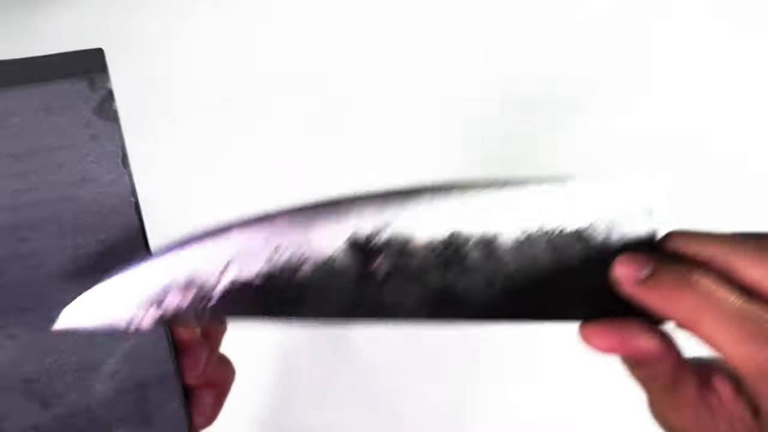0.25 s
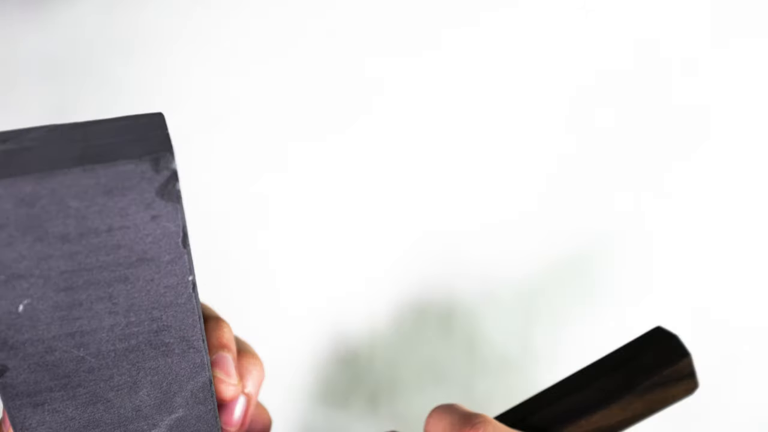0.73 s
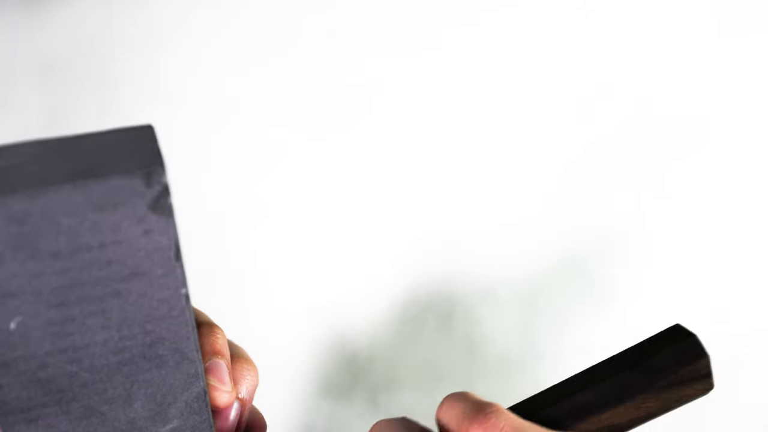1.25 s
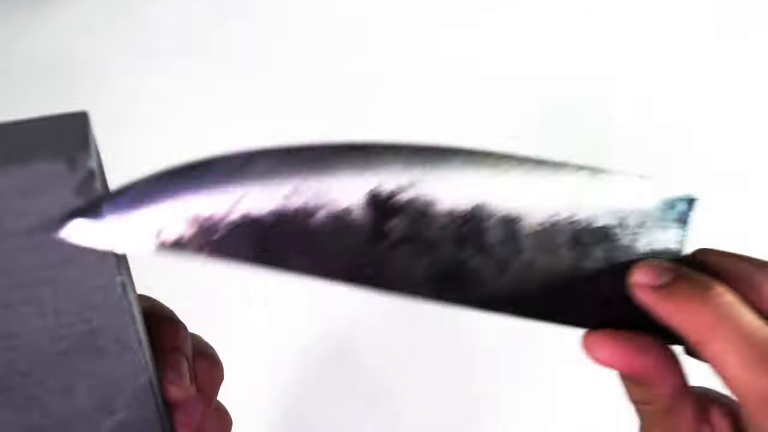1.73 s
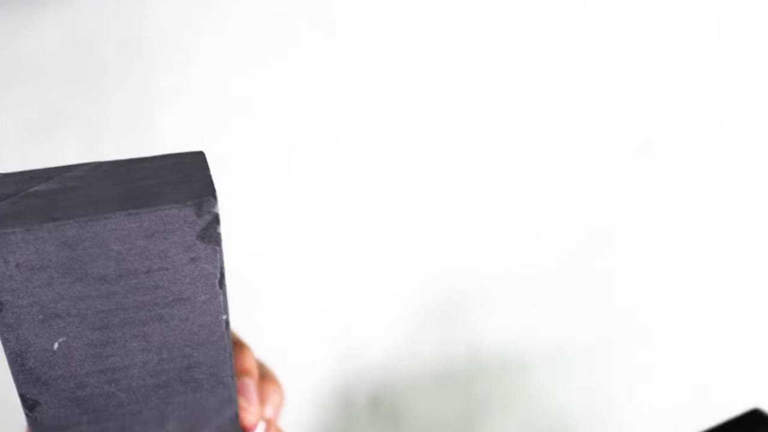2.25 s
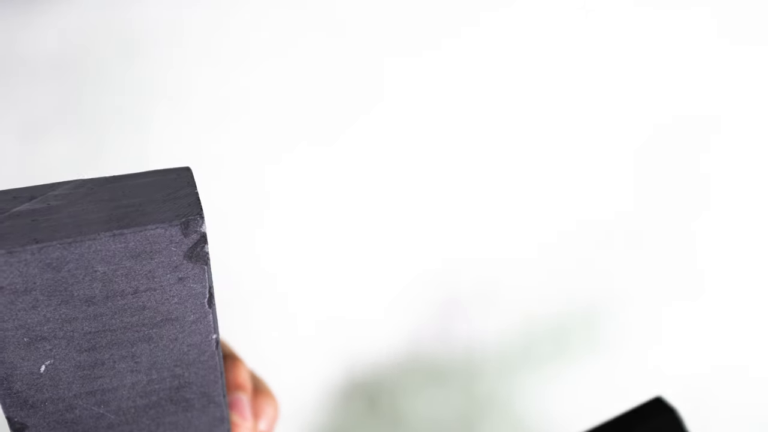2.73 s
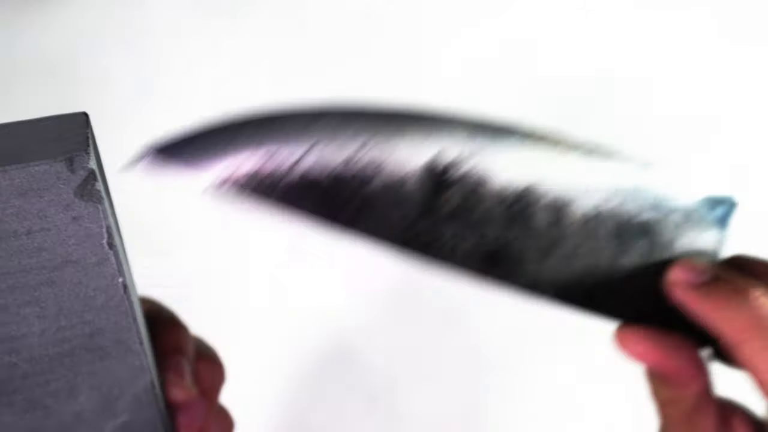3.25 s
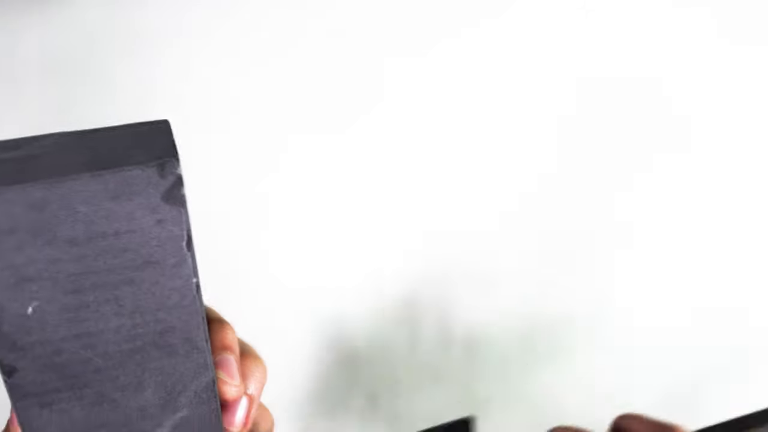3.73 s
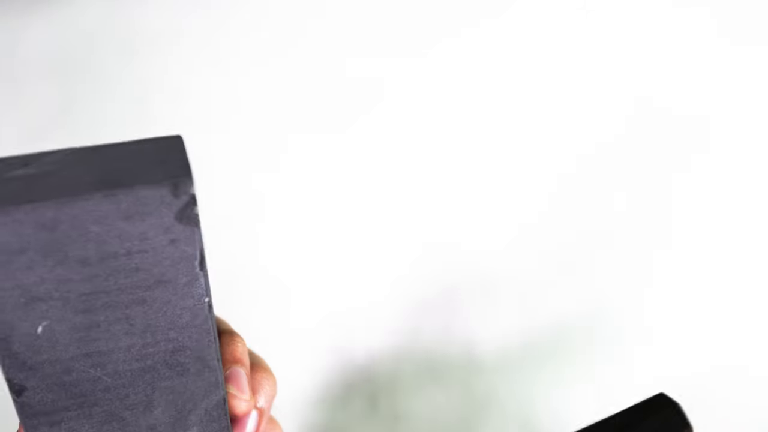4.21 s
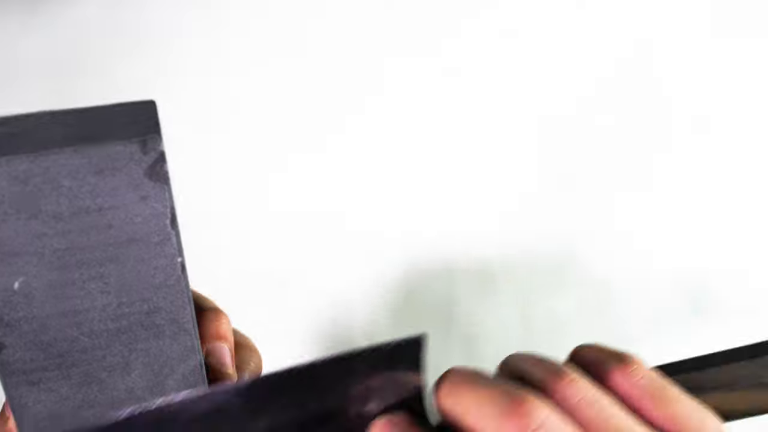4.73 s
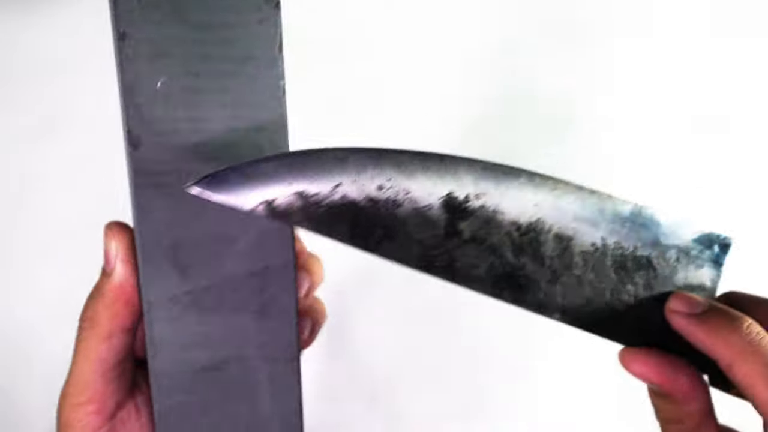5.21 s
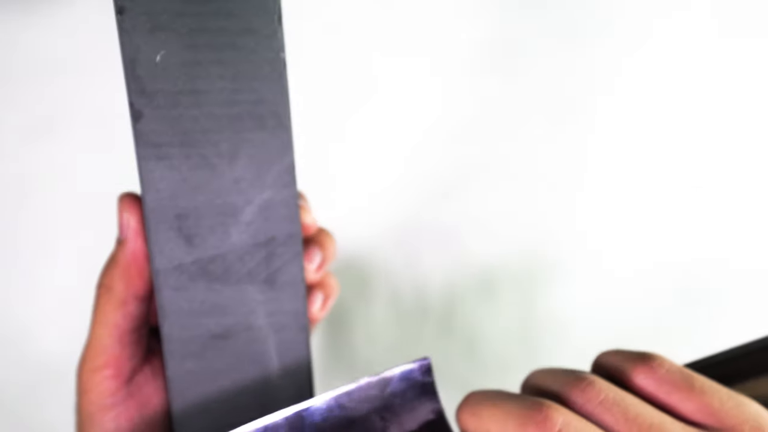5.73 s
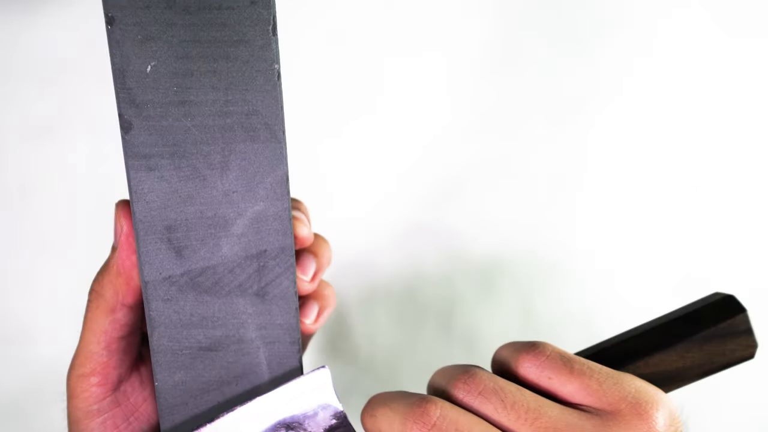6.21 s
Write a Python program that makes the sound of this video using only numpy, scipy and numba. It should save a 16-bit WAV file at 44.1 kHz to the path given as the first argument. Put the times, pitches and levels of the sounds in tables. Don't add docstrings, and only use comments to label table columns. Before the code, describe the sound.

Close gritty scrapes of thin steel on whetstone, one clipped and three full, ringing faintly, with small set-down ticks and a low distant machine hum.

```python
import sys
import numpy as np
from scipy import signal
from scipy.fft import rfft, irfft, next_fast_len
from scipy.io import wavfile
from scipy.ndimage import uniform_filter1d
from numba import njit

SR = 44100
rng = np.random.default_rng(int(sys.argv[2]) if len(sys.argv) > 2 else 0)


def store_wav(level_fs):
    pcm = np.round(np.clip(np.atleast_2d(level_fs), -1, 1) * 32767)
    wavfile.write(sys.argv[1], SR, pcm.T.astype(np.int16))


def convert_level_to_amplitude(level_db):
    exponent = np.asarray(level_db, float) / 20
    return 10 ** exponent


N = 284886
HOP = 32


def unit(x):
    return x / np.sqrt(np.mean(x ** 2) + 1e-20)


def along(points, hz):
    f, v = np.transpose(points)
    return np.interp(np.log(hz + 1), np.log(f + 1), v)


def curves(rows):
    s, *cols = np.transpose(rows)
    return np.array([np.interp(np.arange(N) / SR, s, c) for c in cols])


def wobble(rate, size=1):
    knots = rng.standard_normal(int(N * rate / SR) + 4)
    return np.interp(np.arange(0, N, size) * rate / SR, np.arange(len(knots)), knots)


def coloured(x, gain):
    m = next_fast_len(N + 8192)
    return unit(irfft(rfft(x, m) * gain(np.fft.rfftfreq(m, 1 / SR)), m)[:N])


def blurred(shape, bins, frames):
    field = uniform_filter1d(rng.standard_normal(shape), size=bins, axis=0)
    return unit(uniform_filter1d(field, size=frames, axis=1))


# time in seconds, pressure in dB, contact place from heel 0 to tip 1.
STROKES = [
    [(0, -22, 0.69), (.03, -19, .76), (.094, -16, 0.87), (.135, -25.5, 1)],
    [(1.2, -58.5, 0.028), (1.214, -37.5, 0.036), (1.236, -17.5, 0.12), (1.27, -17, .1), (1.44, -14.5, 0.31),
     (1.59, -19.5, .59), (1.788, -17.5, .84), (1.846, -24.5, 0.91), (1.865, -49, 0.94)],
    [(2.77, -51, 0.052), (2.81, -42.5, 0.048), (2.868, -18, 0.11), (3.045, -14.5, .32), (3.12, -13.5, 0.43),
     (3.16, -18, 0.61), (3.29, -19, 0.83), (3.33, -16.5, .93), (3.35, -38, 0.67)],
    [(4.49, -55.5, 0.12), (4.538, -25, 0.15), (4.588, -15, 0.18), (4.72, -15, .36), (4.8, -17, 0.5),
     (4.845, -20, 0.6), (4.99, -19.5, 0.84), (5.036, -26, 0.88), (5.055, -43, 0.82)],
]
# time in seconds, peak in dB, scrape length in seconds, weight in dB.
TOUCHES = [(0.9995, -27, 0.0007, -5), (1.006, -33.5, 0.016, 8), (1.013, -38.5, 0.023, 2),
           (2.536, -25, 0.011, -1), (2.549, -27.5, 0.013, -1), (2.569, -30, .002, 1),
           (2.607, -38, .003, -4), (2.619, -37, 0.0018, 1), (2.711, -54, .002, 4),
           (2.751, -42.5, 0.0091, -11), (2.764, -27.5, 0.003, -16), (2.804, -47.5, .019, 6),
           (4.266, -38.5, 0.018, 25.5), (4.278, -27, 0.0043, 7), (4.284, -24.5, 0.015, 13.5),
           (4.288, -23, 0.0018, -7), (4.405, -38, 0.011, -20), (4.426, -25, 0.0055, -4),
           (4.431, -24.5, 0.0053, -4), (4.468, -31, 0.0019, -10), (4.472, -35, 0.008, -7),
           (4.521, -28, 0.0027, 7), (4.538, -20.5, 0.0033, 7.5), (5.343, -39, .004, -3),
           (5.636, -45, 0.006, 0), (6.45, -49, 0.0091, -8)]
# start in seconds, end in seconds, place from heel 0 to tip 1,
# damping relative to a stroke.
RESTING = [
    (.98, 1.202, 0.85, 1.8),
    (2.507, 2.7, 0.78, 1.8),
    (2.74, 2.799, 0.09, 1.5),
    (4.25, 4.369, 0.85, 2.1),
    (4.38, 4.492, .11, 0.25),
    (5.3, 6.513, 0.89, 2.3),
]
# place from heel 0 to tip 1, low modes in dB, top modes in dB.
TAPER = [(0, 1.5, -8.5), (.15, 6, 3.5), (.35, -6, 1), (.6, 1.5, 3), (.69, -2, 4.5), (.77, 1, 3.5),
         (.86, -2, 2), (1, -15, 6)]


def pressure():
    t = np.arange(N) / SR
    force, place, stroking, resting = np.zeros((4, N))
    for start, end, spot, damping in RESTING:
        on = (t >= start) & (t < end)
        place[on], resting[on] = spot, damping
    for rows in STROKES:
        on = (t >= rows[0][0]) & (t < rows[-1][0])
        db, place[on] = curves(rows)[:, on]
        force[on], stroking[on] = convert_level_to_amplitude(db), 1
    spot, low, top = np.transpose(TAPER)
    low_db, top_db = np.interp(place, spot, low), np.interp(place, spot, top)
    for s, db, length, weight_db in TOUCHES:
        rise = .4 * length
        on = (t >= s - 2 * rise) & (t < s + 4 * length)
        u = (t[on] - s - rise) / np.where(t[on] < s + rise, rise, length)
        force[on] += convert_level_to_amplitude(db - 12.0) * np.exp(-u * u)
        low_db[on], top_db[on] = weight_db, -2 - 0.41 * weight_db
    return uniform_filter1d(force, size=40), low_db, top_db, place, stroking, resting


def grit(spread_db, chatter_db):
    sizes = convert_level_to_amplitude(spread_db * rng.standard_normal(N) + chatter_db * (wobble(60) + wobble(300)))
    return unit(sizes * rng.standard_normal(N))


# frequency in Hz, level in dB per Hz.
GRIT = [(500, -70), (880, -52), (1050, -24), (1300, -32), (1700, -15), (3500, -10), (4700, -15),
        (6500, -10), (10800, -13), (15500, -21), (16200, -34)]
# place from heel 0 to tip 1, pitch in Hz, gain in dB.
OVERHANG = [(0, 2617, 7.5), (.36, 3000, -1), (.5, 3620, 5.5), (.6, 4335, 15), (0.721, 5930, 11),
            (0.801, 4230, 4.5), (0.868, 3230, 12.5), (1, 2203, 7.5)]


def rasp(place, stroking):
    tap_hz, tap_db = 2900, 9
    hiss = coloured(grit(spread_db=4.5, chatter_db=2.5), lambda f: convert_level_to_amplitude(along(GRIT, f)))
    f, t, z = signal.stft(hiss, SR, nperseg=256)
    where, moving = np.array([place, stroking])[:, np.clip(t * SR, 0, N - 1).astype(int)]
    spot, hz, db = np.transpose(OVERHANG)
    octaves = np.log2((f[:, None] + 1) / np.where(moving, np.interp(where, spot, hz), tap_hz))
    lift = np.exp(-(octaves / .3) ** 2) + np.exp(-((octaves - 1.25) / .25) ** 2)
    lift_db = np.where(moving, np.interp(where, spot, db), tap_db) * lift
    patches_db = 5 * blurred(z.shape, bins=3, frames=12)
    return signal.istft(z * convert_level_to_amplitude(lift_db + patches_db), SR, nperseg=256)[1][:N]


# place from heel 0 to tip 1, pitch in Hz, gain in dB, half width in place.
BITES = [(.05, 7174, 3.5, 0.047), (.09, 4224, 3.5, .04), (0.108, 1721, 3.5, .04), (.19, 3357, 10, 0.14),
         (.2, 1072, 5.5, 0.044), (.25, 7956, 8.5, 0.037), (.3, 3922, 6, 0.068), (.32, 2710, 1, 0.065),
         (.42, 3386, 10, .08), (.42, 8584, 4.5, 0.069), (.45, 8014, 10, 0.046), (.55, 4270, 10.5, .05),
         (.6, 2187, 6.5, 0.044), (.62, 9595, 11.5, .04), (.63, 1640, 10.5, 0.045), (.67, 5570, 7.5, 0.045),
         (.68, 5114, 6.5, 0.041), (.68, 11590, 7, 0.037), (.68, 6066, 8.5, .04), (.69, 14380, 8, .03),
         (.71, 7185, 5.5, 0.055), (.75, 8716, 6, 0.046), (0.771, 1808, 10.5, 0.062), (.8, 2965, 9.5, 0.032),
         (.82, 3953, 13, 0.04), (.82, 10600, 2, .04), (.84, 4930, 8.5, 0.049), (.89, 2420, 6, 0.062),
         (.89, 1614, 1, 0.044)]
# time in seconds, half length in seconds.
PING_SPANS = [
    (1.03, .025),
    (2.565, .03),
    (2.78, .02),
    (2.82, .03),
    (4.3, .03),
    (4.42, .012),
    (4.445, .018),
    (4.48, .015),
    (4.53, .025),
]
# pitch in Hz, gain in dB.
PINGS = [
    [(1400, 9), (2740, 5), (3500, -2), (3830, 8), (4260, -10), (5000, 4), (5870, -1), (7130, -2),
     (7670, -4), (8770, -7), (10600, -4), (11900, 10)],
    [(1700, -15), (2000, -17), (2500, 2), (3190, 4.5), (3520, 8), (3780, -5), (4260, -20), (4700, -15),
     (5030, 3), (6130, 12), (7130, 3), (7680, 16), (8720, -3.5), (10600, -10)],
    [(1840, 11), (2640, 6), (3790, -16), (4300, -15), (5000, -10), (5680, -10), (6460, 24), (7210, 9),
     (8840, 10), (10500, -10)],
    [(2700, 9.5), (2880, 21), (4300, -16), (5000, -8), (6460, 10), (7200, 3)],
    [(1400, 0.5), (2700, 5), (3790, 7.5), (4300, -7), (5000, -5), (6140, 6), (7110, 10), (8750, 0),
     (11900, 8.5)],
    [(5800, 3), (6500, 8), (8000, 10), (9700, -6), (14000, -10)],
    [(2500, -14), (3250, 15.5), (3780, -13), (4230, 1), (5000, -10), (5840, -4), (7240, 8), (8870, 13),
     (9520, 7), (10500, -10), (11100, 10), (12900, 6)],
    [(3190, 13), (7240, 6), (8870, 8), (9600, -6), (11100, 10), (12900, 10)],
    [(3392, 17), (7200, 1.5), (8800, 6)],
]
# time in seconds, pitch in Hz, gain in dB, half length in seconds.
CATCHES = [(0.048, 878, 3, .022), (.035, 7080, 3, .025), (.075, 2830, 6.5, .025), (0.041, 2743, -5, .02),
           (.075, 3810, -6, 0.018), (.11, 5060, 5.5, .03), (.085, 5560, 6, .025), (.11, 3280, -9, .02),
           (1.2687, 6400, 15, 0.013), (1.284, 1813, 5.5, .03), (1.59, 4380, 4.5, .03),
           (1.66, 4270, -0.5, 0.034), (1.4, 5000, -3, 0.035), (1.25, 920, 1, .03),
           (1.37, 1013, -3.5, 0.034), (1.35, 3314, 4.5, .04), (1.44, 2627, 6.5, 0.035),
           (1.51, 3350, 5, .04), (1.651, 12380, 7, .02), (1.775, 2890, 8.5, .025), (1.845, 3490, 10, .02),
           (2.88, 4340, -2.5, .03), (2.891, 5690, 5, .04), (2.9, 3370, 2.5, .04), (2.97, 3430, 3.5, .05),
           (3.13, 3590, 5, .03), (3.17, 4528, 2.5, .025), (3.185, 438, 9.5, .06), (3.187, 9540, 6, .013),
           (3.19, 1635, 5, .025), (3.22, 5100, -3, 0.022), (3.22, 5620, -6, .02), (3.25, 4363, 10, 0.0203),
           (3.255, 7154, 3, 0.024), (3.265, 5600, 9.5, 0.022), (3.28, 2950, 4, .02),
           (3.3, 3874, 4.5, 0.028), (3.32, 5010, 2.5, .03), (3.335, 2530, 6, 0.024), (3.334, 3530, 3, .015),
           (4.54, 1744, -8, 0.051), (4.55, 2400, -3.5, .03), (4.611, 3382, 4.5, .07),
           (4.62, 1076, 7, 0.0099), (4.67, 2527, 0.5, 0.018), (4.73, 2860, 11.5, 0.035),
           (4.825, 9540, 11.5, 0.025), (4.85, 4405, -1.5, .03), (4.94, 2486, 7.5, .04),
           (4.97, 2830, 6, 0.02), (4.98, 1600, 4, .03), (5.013, 8780, 8, .037), (5.035, 1420, 1.5, .025)]
# time in seconds, pitch in Hz, gain
# in dB, half length in seconds.
MORE_CATCHES = [(1.3, 3122, 4, .04), (1.53, 5660, 6.5, .03), (1.556, 1560, 4.5, .06), (1.573, 3280, 4.5, .03),
                (1.6, 2116, 5, .05), (1.62, 1043, 4.5, .09), (1.65, 3910, 4, .03), (1.707, 2470, 0.5, .02),
                (1.702, 5600, -6, .03), (1.75, 1660, 3, .03), (1.81, 2444, 0, .04), (1.81, 5520, 4, .025),
                (1.63, 450, 3.5, .06), (2.87, 11180, 5.5, .03), (2.95, 1690, 3.5, .04), (2.98, 5060, -6.5, .05),
                (3.01, 3336, 5, .04), (3.08, 4320, -5, .03), (3.29, 1000, -7.5, .04), (2.97, 1070, 9, .04),
                (3.053, 2860, 5, .04), (3.065, 3864, 2.5, .04), (3.12, 2600, -4, .03), (3.13, 5030, 5.5, .04),
                (3.132, 5600, 3.5, .03), (3.15, 6050, 6.5, .02), (3.16, 2130, 4, .03), (3.2, 1066, 7, .04),
                (3.24, 2430, 3.5, .04), (3.31, 2790, 4.5, .012), (3.31, 6100, 6.5, .02), (4.574, 3330, 3.5, .03),
                (4.691, 3360, 5, .03), (4.709, 2610, -2.5, .015), (4.73, 1103, 9, .015), (4.73, 4290, 6, .04),
                (4.797, 5050, 11, .03), (4.81, 3430, 15, .04), (4.81, 5830, 5.5, .03), (4.867, 462, 3.5, .05),
                (4.881, 1661, -11, .04), (4.875, 3880, 9.5, .04), (4.885, 6050, 3.5, .03), (4.922, 2480, 0, .015),
                (4.932, 1024, 9, .025), (4.959, 2520, -2, .025), (5.007, 3105, -7, .025),
                (5.026, 2430, -2.5, .03), (5.04, 4990, 2, .03), (4.56, 10660, 6, .03)]
# time in
# seconds, pitch in Hz, gain in dB, half length in seconds.
EXTRA_CATCHES = [
    (1.74, 7100, 5, .05),
    (1.79, 1500, 5, .03),
    (1.84, 5000, -4, .03),
    (3.13, 452, 7, .04),
    (4.9, 8750, -4, .05),
    (4.98, 1650, 5, .03),
]


def bitten(mode, place, stroking):
    modes = LOW_MODES + HIGH_MODES
    centres = np.array([free_hz + stiff_hz / 2 for free_hz, stiff_hz, *_ in modes])
    free_hz, stiff_hz, _, _, waves, shift = modes[mode][:6]

    def mine(hz):
        return np.argmin(np.abs(centres - hz)) == mode

    def held_hz(spot):
        return free_hz + stiff_hz * np.cos(np.pi * (waves * spot + shift)) ** 2

    edge, t = np.linspace(0, 1, num=201), np.arange(0, N, HOP) / SR
    gain_db, pull = np.zeros((2, len(edge)))
    for spot, hz, db, width in BITES:
        if mine(hz):
            bell = np.exp(-((edge - spot) / width) ** 2)
            gain_db += db * bell
            pull += (hz - held_hz(spot)) * bell ** .5
    gain_db = stroking * np.interp(place, edge, gain_db)
    pull = stroking * np.interp(place, edge, pull)
    usual_hz = np.where(stroking, centres[mode], held_hz(place))
    pings = [(s, hz, db, length) for (s, length), rows in zip(PING_SPANS, PINGS) for hz, db in rows]
    for s, hz, db, length in pings + CATCHES + MORE_CATCHES + EXTRA_CATCHES:
        if mine(hz):
            bell = np.exp(-((t - s + 0.0086) / length) ** 2)
            gain_db += db * bell
            pull += (hz - usual_hz) * bell ** .5
    return gain_db, pull


@njit
def resonate(force, drive, spin, keep, skirt, hop):
    out, near, far = np.zeros(len(force)), 0j, 0j
    for i in range(len(force)):
        k = i // hop
        near = keep[k] * spin[k] * near + drive[k] * force[i]
        far = skirt * spin[k] * far + (1 - skirt) * near
        out[i] = far.imag
    return out


# free pitch in Hz, stiffening in Hz, free width in Hz, level in dB, half waves along the edge,
# shift in half waves, liveliest place from heel 0 to tip 1, its gain in dB.
LOW_MODES = [(387, 180, 14, -44.5, 1.5, .28, .6, 21.5), (1023, 88, 6, -23.5, 2.4, 0.26, 0.4, 7.5),
             (1560, 230, 27, -19.5, 3.05, .68, 0.1, 3), (1640, 41, 18, -19.5, 2.1, 0.37, 0.48, 10),
             (2072, 100, 54, -18.5, 2.7, 0.13, 0.8, 3), (2419, 310, 8.2, -9.5, 2.5, 0.15, 0.3, 8),
             (2784, 310, 15, -18.5, 2.25, 0.033, 0.8, 5.5), (3191, 240, 52, -13.5, 3.6, 0.19, 0.43, 11),
             (3431.7, 29, 18, -16.5, 1.2, 0.08, 1, 8.5), (3774, 39, 6.7, -10, 3.9, 0.033, 0.99, -1.5),
             (4259, 110, 48, -12, 4.25, 0.33, .6, 9.5), (4686, 40, 30, -37.5, 1, 0.84, 0, 16.5),
             (5020, 75, 14, -17.5, 4.5, 0.9, 0.76, 12.5), (5675, 110, 120, -11, 1.25, 0.023, 0.6, -1),
             (6100, 250, 24, -24, 0.21, 0.042, 0.8, 8.5)]
HIGH_MODES = [(6400, 82, 25, -25, 4.1, .4, .08, 0.5), (6750, 36, 25, -21, 0.9, 0.13, 0.93, 6.5),
              (7170, 46, 5.5, -11, 1.25, 0.027, 0.7, 2), (7415, 470, 30, -19, 6.8, 0.15, 0.066, 2.5),
              (8030, 76.6, 25, -17, 1.3, 0.33, 0.1308, 3), (8740, 26, 15, -19, 3, 1, .8, 15),
              (8795, 74, 30, -22.5, 1.8, 0.43, 0.35, 6.5), (9690, 100, 27, -25, 1.4, 0.96, 0.4, 16),
              (10470, 43, 22, -19, 1.4, 0.097, .9, 7.5), (11060, 120, 30, -24, 5.8, 0.21, 0.5, 5),
              (12000, 60, 25, -34, 1.4, 0.11, 0.7, 16), (12180, 71, 27, -25, 3.5, .02, 0.81, 8),
              (12770, 60, 30, -25, 1.1, 0.73, 0.63, 8.5), (14100, 120, 30, -29, 3, 0.75, .72, 10),
              (14900, 80, 30, -28, 1.1, 0.54, .7, 7.5)]


def blade():
    force, *controls = pressure()
    held_all = np.clip(uniform_filter1d(force, size=200) / convert_level_to_amplitude(-36), 0, 1)
    held, low_db, top_db, place, stroking, resting = np.array([held_all, *controls])[:, ::HOP]
    damped = np.maximum(held, resting)
    sag = 1 - .2 * held * np.clip((place - .73) / .16, 0, 1)
    grains = force * grit(spread_db=4.5, chatter_db=2.8)
    (sound, own), touching = np.zeros((2, N)), force > 1e-6
    for mode, row in enumerate(LOW_MODES + HIGH_MODES):
        free_hz, stiff_hz, free_width, db, waves, shift, spot, spot_db = row
        swing = np.cos(np.pi * (waves * place + shift)) ** 2
        bite_db, pull = bitten(mode, place, stroking)

        lively_db = spot_db * np.exp(-((place - spot) / 0.15) ** 2)
        tilt_db = low_db * (free_hz < 2300) + top_db * (free_hz > 9000)
        uneven_db = min(3.5, free_hz / 300) * (.8 * wobble(36, size=HOP) + .7 * wobble(90, size=HOP))
        drive = np.sqrt(0.19 + swing) * convert_level_to_amplitude(db + lively_db + tilt_db + uneven_db + bite_db)

        waver_hz = min(.025 * free_hz, 12 + .008 * free_hz, 45)
        waver = .6 * wobble(30, size=HOP) + .65 * wobble(110, size=HOP)
        hz = free_hz + held * stiff_hz * swing + held * waver_hz * waver
        hz = hz * sag ** (min(1000 / free_hz, 1) * (free_hz < 2300))
        spin = np.exp(2j * np.pi * (hz + pull) / SR)

        stone_width = (22 + 0.0033 * free_hz) * (1 + .035 * np.abs(bite_db))
        free_width = free_width + min(20 + .004 * free_hz, .025 * free_hz)
        keep = np.exp(-np.pi * (free_width + damped * stone_width) / SR)
        skirt = np.exp(-np.pi * (50 + .05 * free_hz) / SR)
        norm = np.sqrt(4 * np.pi * (free_width + stone_width) / SR)

        private = force[touching] * rng.standard_normal(N)[touching]
        own[touching] = .4 * grains[touching] + 1.05 * private
        sound += resonate(own, norm * drive, spin, keep, skirt, HOP)
    _, top_db, place, stroking, _ = controls
    hiss_db = -27 + 3 * held_all + 5 * place + .6 * top_db + 2 * (1 - stroking)
    hiss_db = hiss_db + stroking * 2 * np.exp(-((place - .68) / .06) ** 2)
    return convert_level_to_amplitude(-4.0) * sound + convert_level_to_amplitude(hiss_db) * force * rasp(place, stroking)


# frequency in Hz, level in dB per Hz.
HUM = [(18, -66.5), (34, -36), (66, -7), (149, -2), (216, -5), (280, -4), (311, -6), (346, -8), (487, -14),
       (585, -10.5), (891, -16), (1360, -18.5), (3590, -34.5), (14500, -46.5), (16100, -54)]
# pitch in Hz, width in Hz, level in dB.
DRONES = [(116.3, 17, -11), (152, 9.6, -13), (208, 14, -14.5), (289.6, 14, -12.5), (352.5, 19, -12),
          (591, 22, -15), (649.4, 12, -14.5)]


def hum():
    z = signal.stft(rng.standard_normal(N + 512), nperseg=512)[2]
    patches_db = 1.2 * blurred(z.shape, bins=3, frames=14)
    patchy = signal.istft(z * convert_level_to_amplitude(patches_db), nperseg=512)[1][:N]
    sound = coloured(patchy, lambda f: convert_level_to_amplitude(along(HUM, f)))
    for hz, width, db in DRONES:
        drone = coloured(rng.standard_normal(N), lambda f: 1 / (1 + ((f - hz) / (0.12 * width)) ** 2))
        sound += convert_level_to_amplitude(db + 1.9 * wobble(4)) * drone
    return convert_level_to_amplitude(-47.5 + 0.16 * wobble(16.0)) * unit(sound)


# time in seconds, pitch in Hz, level in dB, length in seconds.
THUDS = [
    (.004, 168.4, -26, 0.0096),
    (.93, 162, -51, 0.039),
    (1.12, 150, -44.5, 0.078),
    (1.222, 115.5, -47, 0.07),
    (4.362, 80, -44, 0.038),
]


def thuds():
    t = np.arange(N) / SR
    sound = np.zeros(N)
    for s, hz, db, length in THUDS:
        swell = convert_level_to_amplitude(db) * np.exp(-((t - s) / length) ** 2)
        sound += swell * np.sin(2 * np.pi * hz * (t - s) + 0.57 * wobble(19.0))
    return sound


# frequency in Hz, time to fall 60 dB in seconds.
WALLS = [(800, 0.11), (2500, 0.29), (6000, 0.29), (15000, 0.23)]


def walls(x):
    late = np.pad(x, (400, 0))[:N]
    hz, t, z = signal.stft(np.array([late, rng.standard_normal(N)]), SR, nperseg=640, noverlap=512)
    keep = convert_level_to_amplitude(-120 * t[1] / along(WALLS, hz))
    energy = np.array([signal.lfilter([1 - k], [1, -k], np.abs(band) ** 2) for k, band in zip(keep, z[0])])
    carrier = z[1] / np.sqrt(np.mean(np.abs(z[1]) ** 2))
    answer = carrier * np.sqrt(uniform_filter1d(energy, size=6, axis=0))
    return signal.istft(answer, SR, nperseg=640, noverlap=512)[1][:N]


def scene():
    no_bass = signal.butter(2, 330, "high", fs=SR, output="sos")
    knife = convert_level_to_amplitude(3.0) * signal.sosfilt(no_bass, blade())
    return (knife + convert_level_to_amplitude(-10.5) * walls(knife) + hum() + thuds())[None]


def top_cut(x):
    return signal.sosfilt(signal.butter(12, 16220, fs=SR, output="sos"), x)


def record(dry):
    dry = signal.sosfilt(signal.butter(4, 48, "high", fs=SR, output="sos"), dry)
    level_db = 10 * np.log10(np.abs(uniform_filter1d(dry[0] ** 2, size=1500)) + 1e-12)
    need_db = 0.23 * np.clip(level_db + 26.0, 0, None)
    creep_db = 4 * np.arange(N) / SR
    cut_db = np.maximum.accumulate(need_db + creep_db) - creep_db
    held = dry * convert_level_to_amplitude(-uniform_filter1d(np.clip(cut_db, 0, None), size=400))
    held = held / (1 + np.abs(held / .52) ** 4) ** (1 / 4)
    held = signal.sosfilt(signal.ellip(10, .5, 60, 16030, fs=SR, output="sos"), held)
    return top_cut(held)


dry = scene()
out = record(dry)
store_wav(out)
```